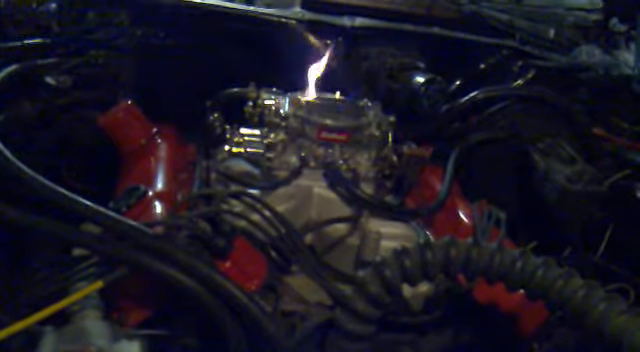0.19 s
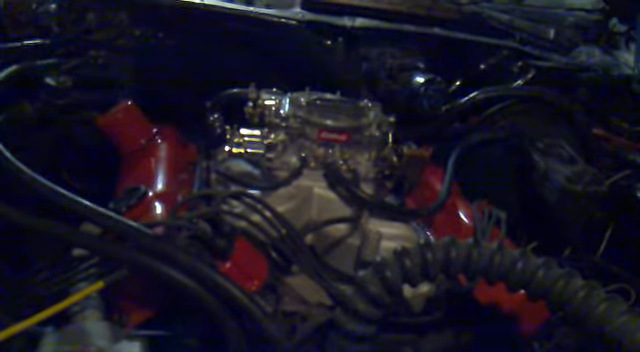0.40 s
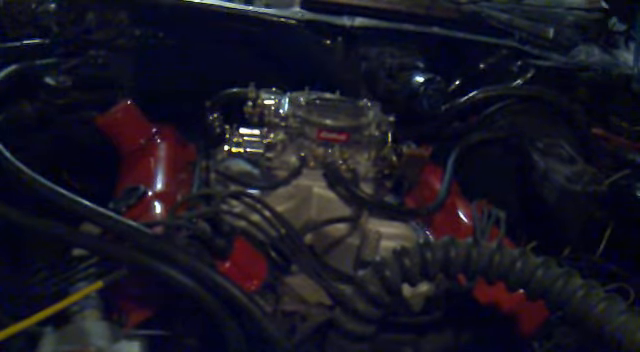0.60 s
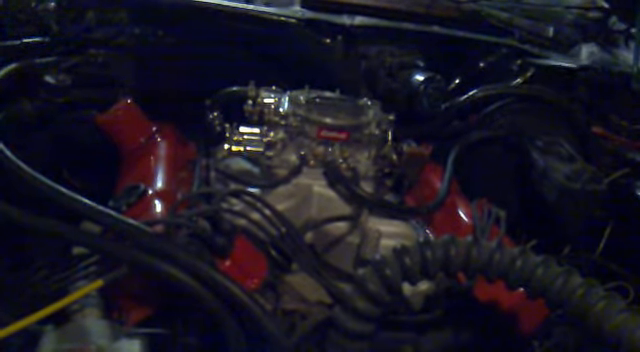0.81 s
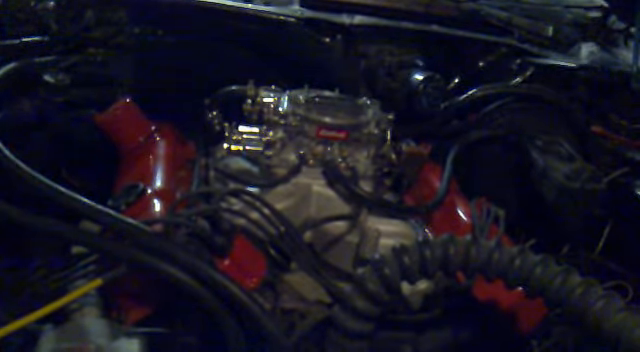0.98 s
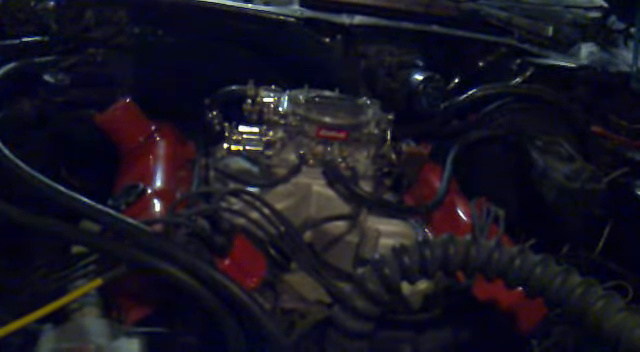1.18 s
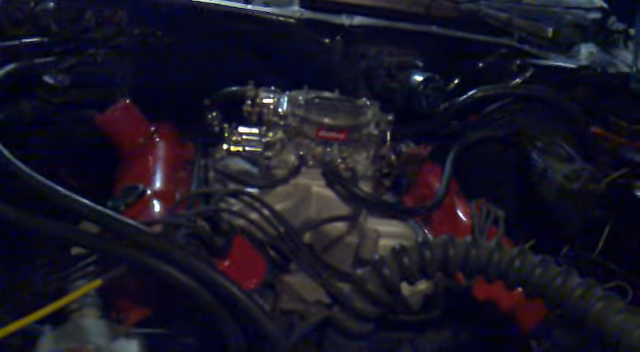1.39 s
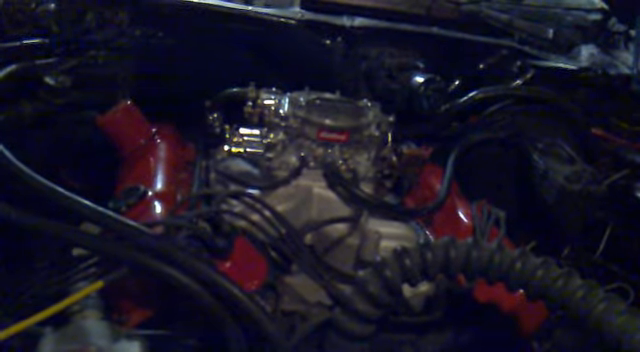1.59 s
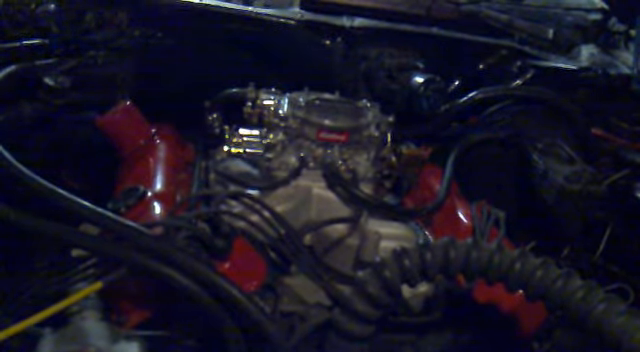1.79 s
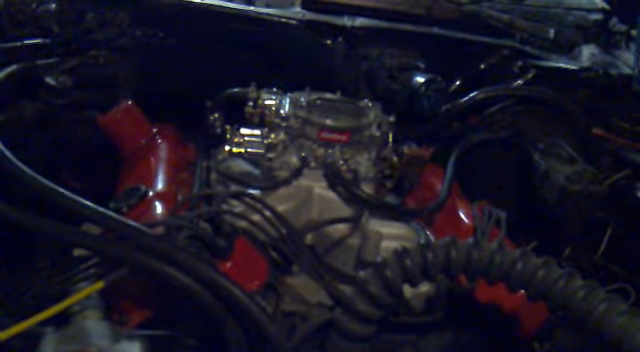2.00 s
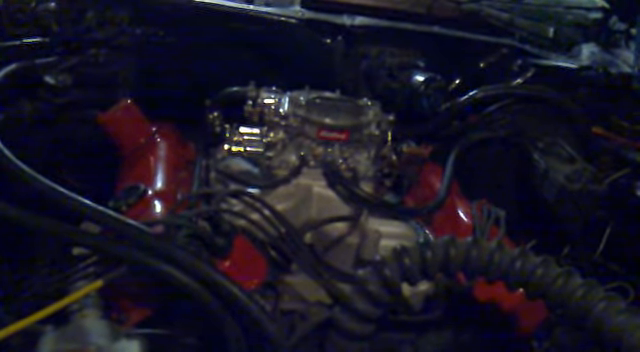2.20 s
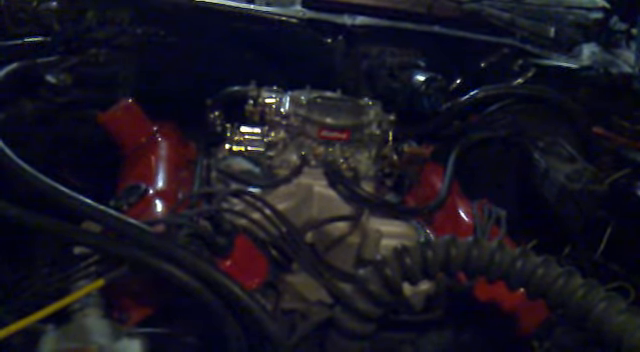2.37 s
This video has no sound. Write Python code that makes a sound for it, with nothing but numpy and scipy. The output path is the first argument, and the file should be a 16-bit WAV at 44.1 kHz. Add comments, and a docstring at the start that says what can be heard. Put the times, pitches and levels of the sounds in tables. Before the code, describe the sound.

A big engine backfires through its carburetor with a booming pop, then a brief bright whoosh

```python
"""Faint hisses of air, then a stalled V8 backfires through its carburettor in a garage, overloading the microphone.
The flame is a few puffs of coloured noise ringing in the throat; the intake booms as noise in narrow resonators,
and decaying sines are the low modes shaken by the pressure wave. Soft hisses and small knocks follow,
then the carburettor blows out a bright whoosh of resonant noise with thin whistles in it.
Filtered noise also makes a deep rumble, the garage's reflections and its still air."""
import sys
import numpy as np
from scipy import signal
from scipy.fft import rfft, irfft
from scipy.io import wavfile
from scipy.ndimage import uniform_filter1d

SR = 44100
rng = np.random.default_rng(int(sys.argv[2]) if len(sys.argv) > 2 else 0)


def master_out(mix):
    """Clip the mix to full scale and print it as 16-bit PCM to the path in sys.argv[1]."""
    frames = np.transpose(np.atleast_2d(mix))
    ceiling = np.clip(frames, -1, 1)
    pcm = np.round(ceiling * 32767).astype(np.int16)
    wavfile.write(sys.argv[1], SR, pcm)


N = 105840  # samples: 2.4 s


def from_db(db):
    """Turn decibels into gain."""
    return 10 ** (np.asarray(db) / 20)


def rms_one(x):
    """Scale to unit rms."""
    return x / np.sqrt(np.mean(x ** 2) + 1e-20)


def seconds():
    """Give the time of every sample."""
    return np.arange(N) / SR


def spectrum_hz():
    """Give the frequency of every bin of the whole-scene spectrum."""
    return np.arange(N // 2 + 1) * SR / N


def at_hz(points, hz):
    """Read a curve on a log-frequency axis."""
    table = np.array(points)
    return np.interp(np.log(np.maximum(hz, 1)), np.log(table[:, 0]), table[:, 1])


def tilted(colour, tilt_db):
    """Tilt a colour by so many dB per octave; positive is brighter."""
    return [(hz, db + tilt_db * np.log2(hz)) for hz, db in colour]


def noise(colour):
    """Shape white noise to a colour, without infrasound; rms 1."""
    hz = spectrum_hz()
    spectrum = rfft(rng.standard_normal(N))
    audible = hz > 18
    return rms_one(irfft(spectrum * from_db(at_hz(colour, hz)) * audible, N))


def resonate(x, hz, width_hz):
    """Ring a two-pole resonance with gain 1 on top."""
    radius = np.exp(-np.pi * width_hz / SR)
    zeros = np.array([1, 0, -1]) * (1 - radius * radius) / 2
    poles = [1, -2 * radius * np.cos(2 * np.pi * hz / SR), radius * radius]
    return signal.lfilter(zeros, poles, x)


def with_rings(flow, rings):
    """Add resonances, each fed by the flow, to the flow itself; rms 1."""
    ringing = sum(from_db(db) * resonate(flow, hz, width) for hz, width, db in rings)
    return rms_one(flow + ringing)


def swing(hz, width_hz, evenness):
    """Let noise swing around one pitch through two resonators, its level evened as asked; rms 1."""
    narrow = resonate(rng.standard_normal(N), hz, width_hz)
    x = resonate(narrow, hz, 2 * width_hz)
    envelope = np.abs(signal.hilbert(x))
    return rms_one(x / envelope ** evenness)  # evenness 1 leaves a steady level


def flutter(depth_db, rate_hz=130):
    """Swing the level as turbulence does: rms depth in dB, swings slower than the rate."""
    lowpass = signal.butter(2, rate_hz, fs=SR, output="sos")
    slow = signal.sosfilt(lowpass, rng.standard_normal(N))
    return from_db(depth_db * rms_one(slow))


def gust(s, db, rise, hold, fall_db_per_s):
    """Swell from nothing to full strength at s, hold, then die away at a steady dB rate."""
    t = seconds() - s
    swell = np.clip(1 + t / rise, 0, 1) ** 2
    level_db = db - fall_db_per_s * np.maximum(t - hold, 0)
    return swell * from_db(np.maximum(level_db, -200))


def gusts(rows, fall_db_per_s):
    """Join overlapping gusts into one envelope, added by power."""
    return np.sqrt(sum(gust(*row, fall_db_per_s) ** 2 for row in rows))


def jets(rows, colour, rings, fall_db_per_s):
    """Blow spurts of gas through one set of resonances, each with its own brightness."""
    out = np.zeros(N)
    for s, db, rise, hold, tilt in rows:
        gas = with_rings(noise(tilted(colour, tilt)), rings)
        out += gas * gust(s, db, rise, hold, fall_db_per_s)
    return out


# Colour of the garage's still air: f/Hz, relative level/dB per Hz
STILL_AIR_COLOUR = [(25, 0), (80, -2), (160, -5.5), (300, -1.5), (700, -4), (2000, -9.5), (6000, -12),
                    (15500, -16.5)]
STILL_AIR_DB = -70.5


def still_air():
    """Lay a steady bed of faint coloured noise under the scene."""
    return from_db(STILL_AIR_DB) * noise(STILL_AIR_COLOUR)


# Surges of moving air: t/s at full strength, level/dB, rise/s, hold/s
RUMBLE_SURGES = [(.215, -30, 0.03, 0.036), (.265, -24, 0.067, .07), (.55, -50.5, .1, 0.14),
                 (1.11, -63, .035, 0.035), (1.17, -56.5, .04, 0.053), (1.33, -70.5, .05, 0.3),
                 (2.15, -64, 0.043, 0.36)]
# Their deep colour: f/Hz, relative level/dB per Hz
RUMBLE_COLOUR = [(20, 4), (35, 4), (60, -9), (90, -10.5), (160, -20), (400, -43.5), (2000, -88)]
RUMBLE_FALL_DB_PER_S = 124.5


def rumble():
    """Swell deep noise in slow surges of air, felt more than heard."""
    return noise(RUMBLE_COLOUR) * gusts(RUMBLE_SURGES, RUMBLE_FALL_DB_PER_S)


# Small knocks: t/s at full strength, level/dB, f/Hz, width/Hz of the narrower resonator
SMALL_KNOCKS = [(1.185, -51.5, 1230, 400), (1.417, -54.5, 252, 158), (1.712, -72.5, 241.6, 159.5)]
KNOCK_RISE_S, KNOCK_HOLD_S, KNOCK_FALL_DB_PER_S = .005, 0.0037, 295


def knocks():
    """Ring small knocks briefly as narrow noise of even level."""
    out = np.zeros(N)
    for s, db, hz, width in SMALL_KNOCKS:
        envelope = gust(s, db, KNOCK_RISE_S, KNOCK_HOLD_S, KNOCK_FALL_DB_PER_S)
        out += swing(hz, width, evenness=1.0) * envelope
    return out


# Soft hisses: t/s at full strength, level/dB, rise/s, hold/s,
# resonance f/Hz, gain/dB of the added resonance, tilt/dB per octave
SOFT_HISSES = [(0, -66, .02, 0.029, 300, 7, -0.5), (0.03, -54.5, 0.059, 0.014, 2480, 1.5, -1),
               (0.107, -60, 0.036, 0.026, 340, -13, 0), (.17, -47.5, 0.0096, 0.011, 495, -2, -3),
               (0.476, -59.5, 0.081, 0.067, 9900, -3, 1.5), (0.572, -62, 0.059, 0.071, 1500, -22, 0),
               (.665, -59, 0.023, 0.053, 4966, 8.5, -0.5), (.72, -55, 0.021, 0.018, 850, 3, 0),
               (0.782, -57, 0.019, .012, 1390, 3, 2), (0.836, -68, .03, 0.036, 1354, 3, 1),
               (1.159, -57.5, 0.044, 0.019, 1090, -8.5, 1), (1.178, -51, 0.011, .004, 1674, -1, 0),
               (1.221, -55, 0.035, 0.09, 600, -6, 0.7), (1.287, -48.5, 0.057, 0.04, 670, 3, 1.5),
               (1.365, -57.5, 0.022, 0.024, 603, -21.5, 0), (1.426, -58, 0.028, 0.073, 2980, -1.5, 3),
               (1.5, -57.5, 0.025, 0.026, 3150, -14, -0.5), (1.571, -73.5, .04, 0.28, 300.7, -1, 1.5),
               (1.875, -65, .06, 0.25, 300, -2.5, 0.5), (1.942, -63.5, 0.048, .025, 497, -5.5, -2),
               (2.35, -63, 0.036, .05, 1290, -8, 7)]
# Their common colour: f/Hz, relative level/dB per Hz
HISS_COLOUR = [(30, -10), (90, -6), (180, -7), (265, 3.5), (400, 1), (700, -1), (1500, -2.5), (2500, -4.5),
               (5500, -9), (10000, -16), (15500, -21.5)]
HISS_FALL_DB_PER_S, HISS_Q, HISS_FLUTTER_DB = 284, 2.5, 0.5


def hisses():
    """Brush faint noise past the ear, each hiss with its own brightness and broad resonance."""
    out = np.zeros(N)
    for s, db, rise, hold, hz, gain_db, tilt in SOFT_HISSES:
        air = noise(tilted(HISS_COLOUR, tilt))
        hiss = with_rings(air, [(hz, hz / HISS_Q, gain_db)])
        out += hiss * gust(s, db, rise, hold, HISS_FALL_DB_PER_S)
    return out * flutter(HISS_FLUTTER_DB)


# Edge tones that catch briefly in the whoosh: t/s at full strength, level/dB, rise/s, hold/s, f/Hz
WHISTLE_CATCHES = [(2.14, -56, 0.017, .006, 3400), (2.161, -30, 0.021, .004, 2080),
                   (2.185, -33.5, 0.03, 0.0096, 3325), (2.214, -27, .012, .005, 3293),
                   (2.231, -40.5, 0.024, 0.024, 1238), (2.234, -40.5, 0.029, 0.0054, 3340)]
WHISTLE_WIDTH_HZ = 49  # of the narrower resonator
WHISTLE_FALL_DB_PER_S = 420


def whistle():
    """Let rough edge tones, narrow noise of half-evened level, come and go in the whoosh."""
    out = np.zeros(N)
    for s, db, rise, hold, hz in WHISTLE_CATCHES:
        tone = swing(hz, WHISTLE_WIDTH_HZ, evenness=0.49)
        out += tone * gust(s, db, rise, hold, WHISTLE_FALL_DB_PER_S)
    return out


# Spurts of the whoosh: t/s at full strength, level/dB, rise/s, hold/s, tilt/dB per octave
WHOOSH_SPURTS = [(2.144, -31.5, 0.03, 0.038, 0), (2.18, -28.5, 0.057, .038, -0.45),
                 (2.232, -32, 0.046, 0.018, -1.3), (2.29, -52.5, 0.033, 0.013, -2)]
# Their common colour: f/Hz, relative level/dB per Hz
WHOOSH_COLOUR = [(40, -41), (150, -14.5), (350, -9), (700, -5), (1250, -1), (2400, -1), (3400, -2.5),
                 (4600, -4), (6500, -6), (10000, -13.5), (15500, -24)]
# Whistling resonances in the whoosh: f/Hz, width/Hz, gain/dB of the added resonance
WHOOSH_RINGS = [(1245, 130, -13), (1492, 55, -6), (2004, 55, -8), (3330, 130, 1.5), (3700, 22, 7),
                (5370, 37, -5)]
WHOOSH_FALL_DB_PER_S, WHOOSH_FLUTTER_DB = 380, 1.13


def whoosh():
    """Blow gas back past the throttle plates, each spurt duller as the pressure drops."""
    gas = jets(WHOOSH_SPURTS, WHOOSH_COLOUR, WHOOSH_RINGS, WHOOSH_FALL_DB_PER_S)
    return gas * flutter(WHOOSH_FLUTTER_DB)


# Low modes of engine bay and garage: f/Hz, starting level/dB before the soft onset, t60/s
LOW_MODES = [(28.5, -26, .8), (42.5, -25, .7), (74, -25, .85), (81, -15.5, .45), (110, -20, .4),
             (150, -31, .42), (205, -29, .38), (276, -29, .42)]
THUMP_S, THUMP_RISE_S = 0.3, 0.0032  # start, time constant of the onset


def thump():
    """Leave the low modes ringing after the pressure wave, as sines that die away."""
    t = np.maximum(seconds() - THUMP_S, 0)
    rings = np.zeros(N)
    for hz, db, t60 in LOW_MODES:
        rings += from_db(db - 60 * t / t60) * np.sin(2 * np.pi * hz * t)
    soft_onset = 1 - np.exp(-t / THUMP_RISE_S)
    return rings * soft_onset


# Swings of the intake gas: t/s at full strength, level/dB, rise/s, hold/s,
# f/Hz, width/Hz of the narrower resonator
INTAKE_BOOMS = [(.226, -22, 0.017, 0.062, 330, 150), (.286, -6, 0.044, 0.0069, 325, 88),
                (.32, -15, .012, 0.0027, 365, 140), (.274, -12, .025, 0.035, 95, 51),
                (.37, -30.5, .04, 0.049, 220, 87)]
BOOM_FALL_DB_PER_S, BOOM_EVENNESS = 409.5, .85


def boom():
    """Swing the gas in the intake hard, as narrow noise of nearly even level, around the blast."""
    out = np.zeros(N)
    for s, db, rise, hold, hz, width in INTAKE_BOOMS:
        gas = swing(hz, width, BOOM_EVENNESS)
        out += gas * gust(s, db, rise, hold, BOOM_FALL_DB_PER_S)
    return out


# Puffs of the backfire: t/s at full strength, level/dB, rise/s, hold/s, tilt/dB per octave
FLAME_PUFFS = [(.196, -22.5, .018, 0.039, 0.17), (.224, -17, .026, .01, -0.8),
               (.261, -13, .018, 0.016, 1.42), (0.303, -22, .025, 0.033, -1.36)]
# Colour of the flame jet: f/Hz, relative level/dB per Hz
FLAME_COLOUR = [(40, -14), (120, -2.5), (300, 0), (600, -1), (1000, -3.5), (2200, -6), (3200, -9),
                (6000, -12), (9000, -22), (15500, -33)]
# Resonances of the carburettor throat: f/Hz, width/Hz, gain/dB of the added resonance
THROAT_RINGS = [(626.5, 24, 2), (739, 37, -2), (1366, 43, 2.5), (1745, 42, -6), (2970, 240, -4.5)]
PUFF_FALL_DB_PER_S, PUFF_FLUTTER_DB = 330.5, 0.3


def flame():
    """Jet burning mixture out of the carburettor throat; the hardest puff is the brightest."""
    puffs = jets(FLAME_PUFFS, FLAME_COLOUR, THROAT_RINGS, PUFF_FALL_DB_PER_S)
    return puffs * flutter(PUFF_FLUTTER_DB)


# Decay of the garage's reflections: f/Hz, t60/s
GARAGE_DECAY = [(60, 0.54), (200, 0.44), (500, .35), (1000, .32), (4000, 0.26), (12000, 0.2)]
GARAGE_DELAY_S, GARAGE_SMOOTH_HZ = .005, 40


def garage(x):
    """Reflect densely with even colour, the treble dying faster than the bass."""
    t, hz = seconds(), spectrum_hz()
    white = rfft(rng.standard_normal(N))
    tail = np.zeros(N)
    edges = 30 * 2. ** np.arange(11)  # octave bands, Hz
    for low, high in zip(edges, edges[1:]):
        t60 = at_hz(GARAGE_DECAY, np.sqrt(low * high))
        band = irfft(white * (hz >= low) * (hz < high), N)
        tail += band * np.exp(-np.log(1000) * t / t60)
    # even out the colour, then keep the reflections between the delay and 1 s
    response = rfft(tail)
    power = uniform_filter1d(np.abs(response) ** 2, size=int(GARAGE_SMOOTH_HZ * N / SR))
    tail = irfft(response / np.sqrt(power), N) * (t > GARAGE_DELAY_S) * (t < 1)
    unit_energy = tail / np.sqrt(np.sum(tail ** 2))
    return signal.fftconvolve(x, unit_energy)[:N]


GARAGE_DB, BOOM_GARAGE_DB = -6.5, -12.5  # sends to the reflections


def scene():
    """Mix the engine's noises and their reflections in the garage over still air."""
    near = flame() + whoosh() + whistle() + hisses() + knocks()
    blast = boom()
    reflections = garage(from_db(GARAGE_DB) * near + from_db(BOOM_GARAGE_DB) * blast)
    mix = near + blast + reflections + thump() + rumble() + still_air()
    return mix[None]


OVERLOAD, OVERLOAD_HARDNESS = .72, 3.7  # ceiling of the peaks (full scale 1), sharpness of the knee
CUTOFF_HZ = 15700


def record(dry):
    """Flatten the highest peaks as an overloaded microphone does, then cut the top."""
    bend = 1 + np.abs(dry / OVERLOAD) ** OVERLOAD_HARDNESS
    flattened = dry / bend ** (1 / OVERLOAD_HARDNESS)
    lowpass = signal.ellip(12, .1, 80, CUTOFF_HZ, fs=SR, output="sos")
    return signal.sosfilt(lowpass, flattened)


dry = scene()
out = record(dry)
master_out(out)
```